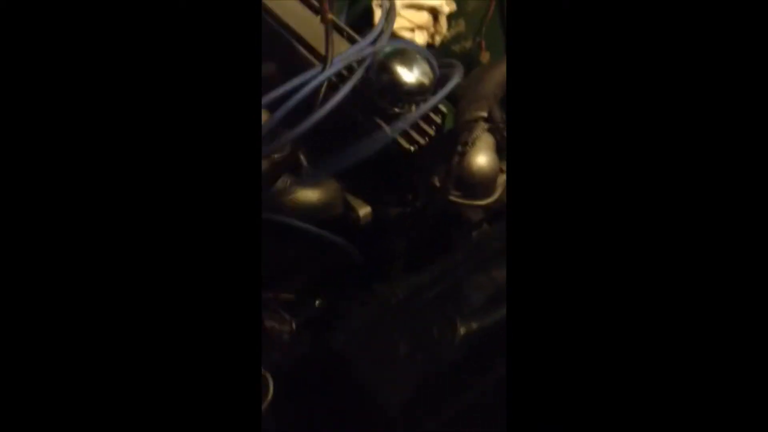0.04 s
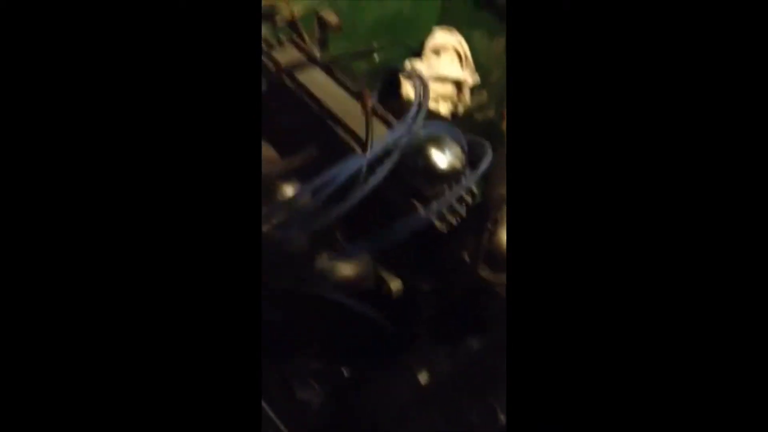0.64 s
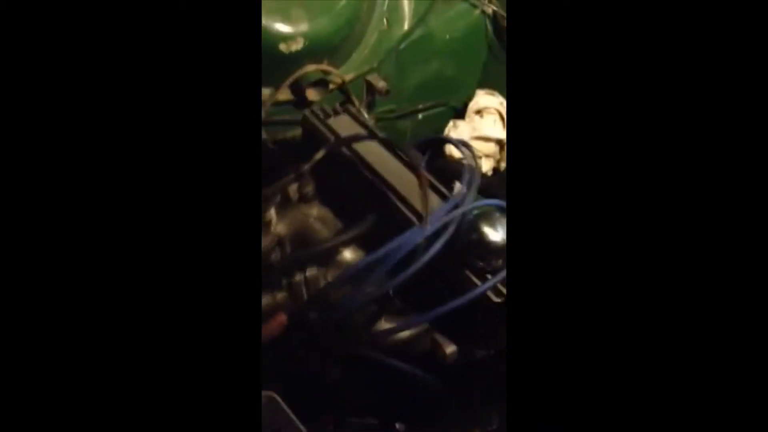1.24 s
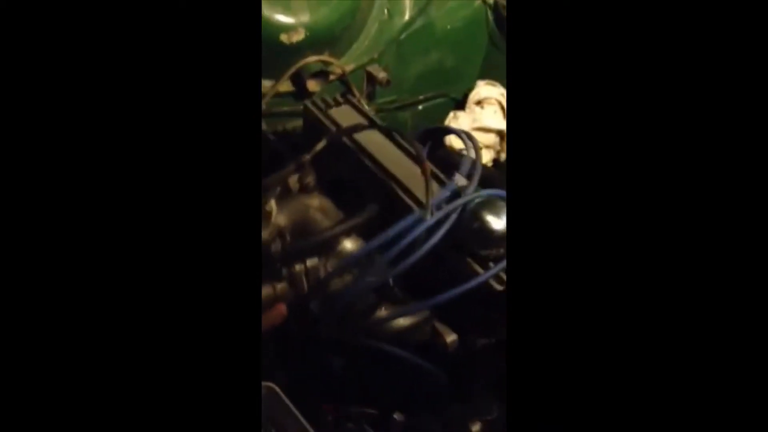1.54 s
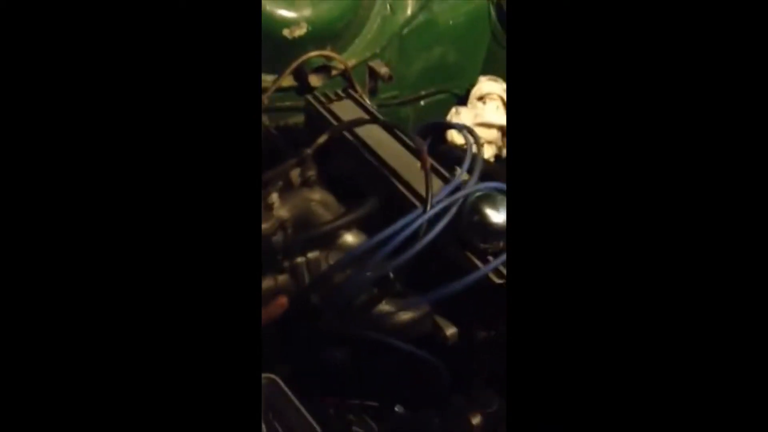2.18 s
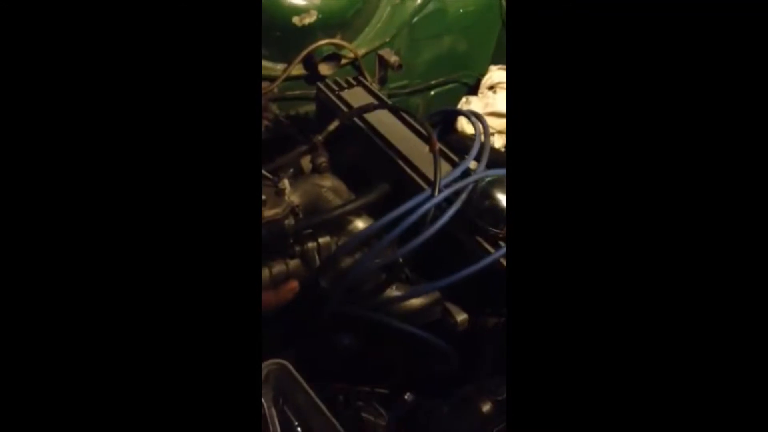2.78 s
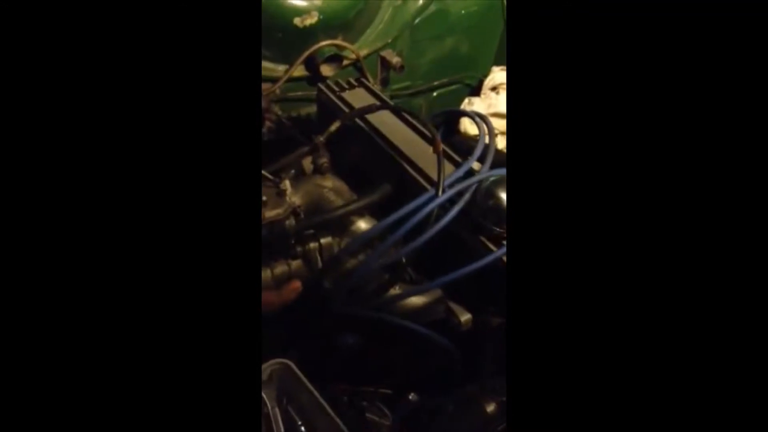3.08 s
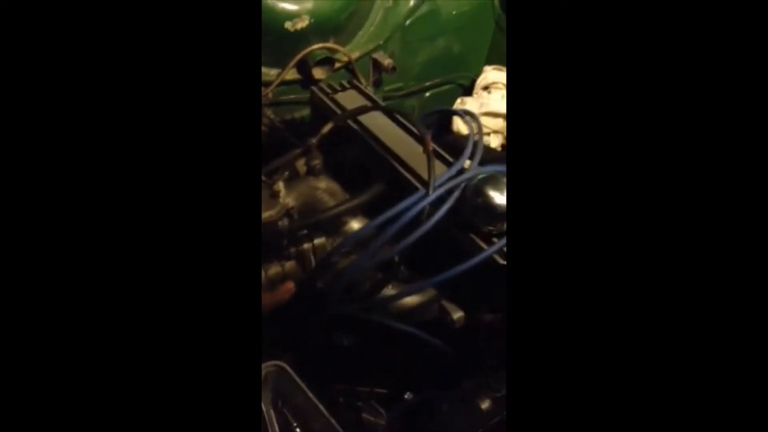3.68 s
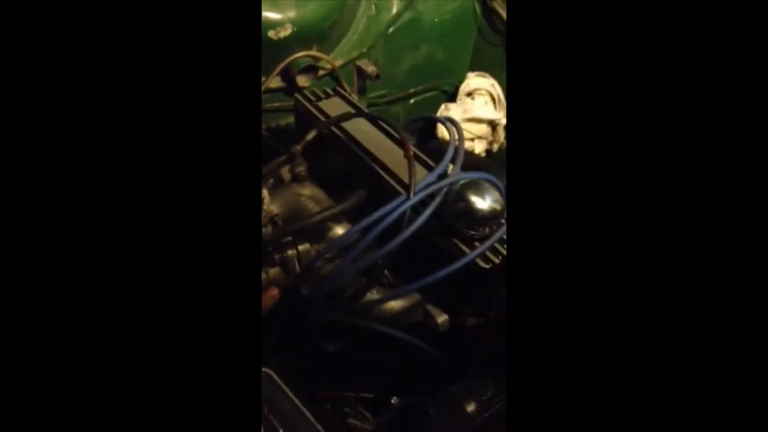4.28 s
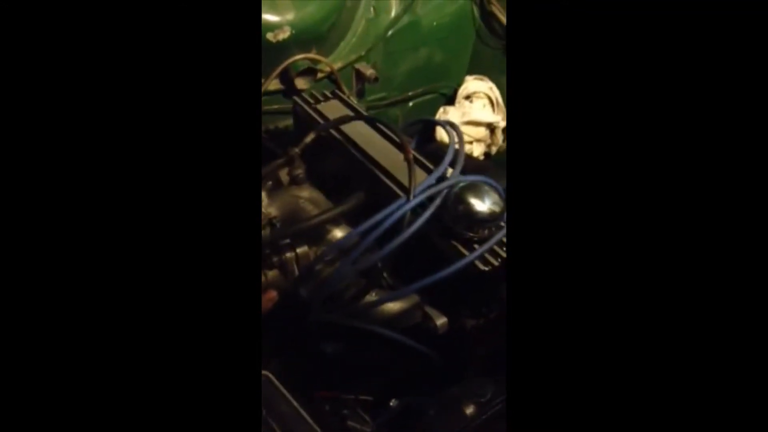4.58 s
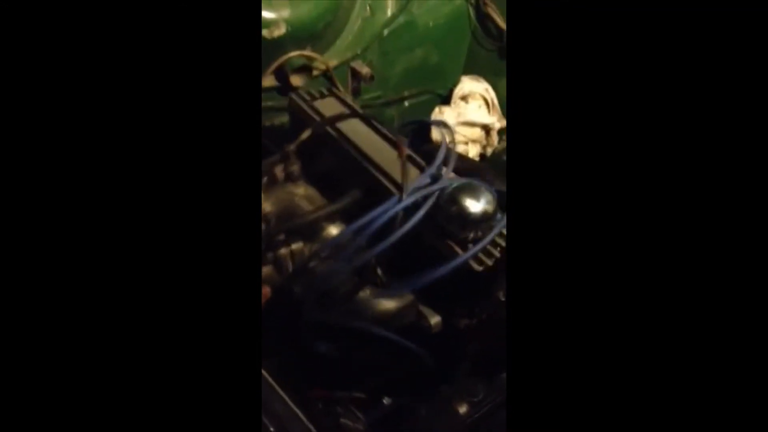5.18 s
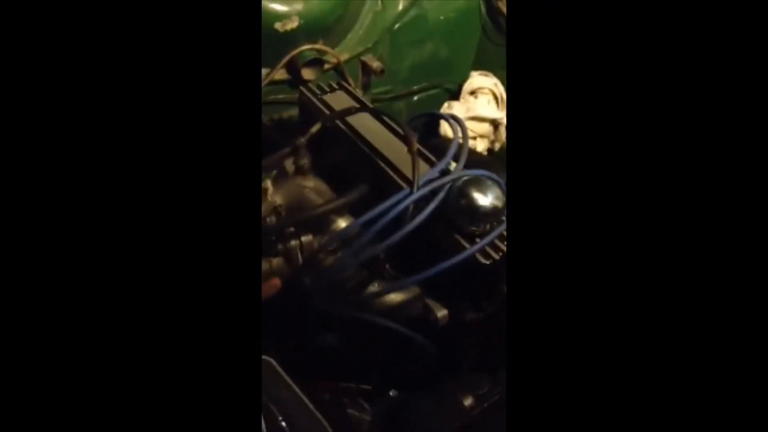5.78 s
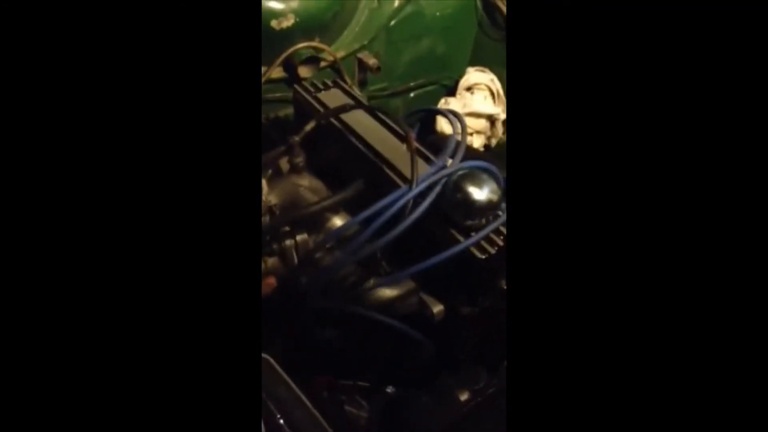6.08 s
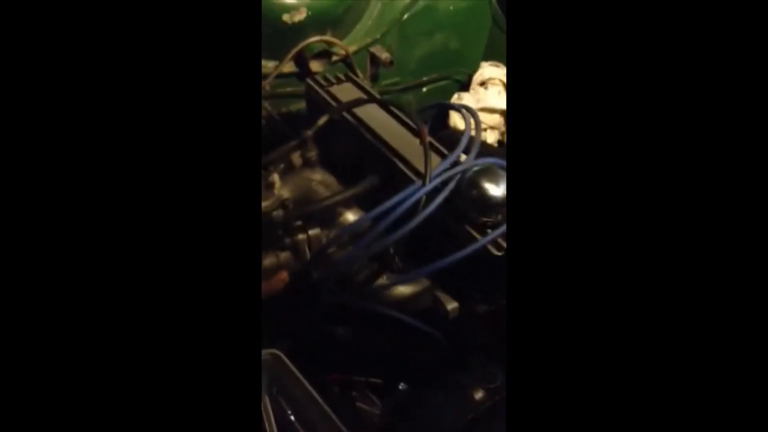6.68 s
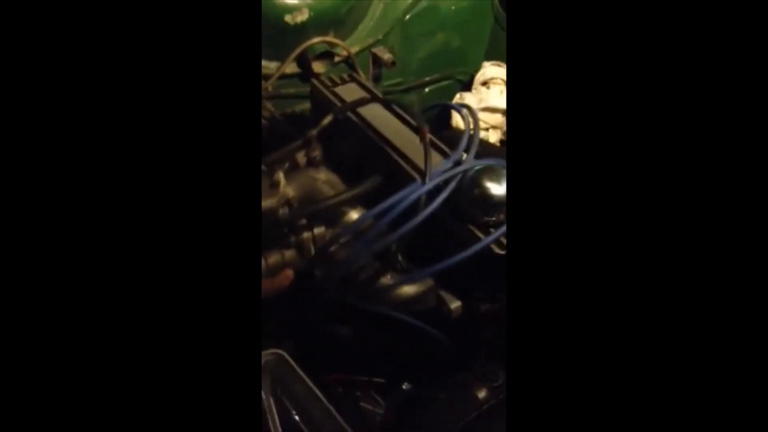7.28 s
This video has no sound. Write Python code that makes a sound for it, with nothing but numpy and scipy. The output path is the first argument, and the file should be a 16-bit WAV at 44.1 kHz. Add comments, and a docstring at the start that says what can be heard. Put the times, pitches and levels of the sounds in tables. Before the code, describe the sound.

An unevenly idling car engine knocks loudly about ten times a second, with bright metallic rattle, ticking and low hum, once nearly stalling.

```python
"""A bad, heavy knock from an unevenly idling four-cylinder car engine, heard just over the open bay.
Once every four-stroke cycle a blow rings the block and shakes loose metal into a bright rattle.
Between the blows the valve gear ticks and whirrs over a low hum and rumble. Crank speed drives them:
faster, the blows land harder and the rattle is shorter and weaker. The engine shudders at the start
and again later, when it misfires and nearly stalls."""
import sys
import numpy as np
from scipy import signal
from scipy.fft import rfft, irfft, next_fast_len
from scipy.io import wavfile
from scipy.ndimage import uniform_filter1d

SR = 44100
rng = np.random.default_rng(int(sys.argv[2]) if len(sys.argv) > 2 else 0)


def persist_wave(psi):
    """Save psi, clipped to +-1, as 16-bit WAV."""
    counts = np.round(np.clip(psi, -1, 1) * 32767).astype(np.int16)
    wavfile.write(sys.argv[1], SR, np.atleast_2d(counts).T)


N = 323694


def undb(db):
    """Decibels to gain."""
    return np.exp(np.asarray(db) * (np.log(10) / 20))


def unit(x):
    """Scale to rms 1."""
    return x / np.sqrt(np.mean(x ** 2))


def noise(points):
    """Noise of rms 1 with a spectrum of (Hz, dB) points."""
    hz, db = np.transpose(points)
    size = next_fast_len(N, real=True)
    bin_hz = np.maximum(np.arange(size // 2 + 1) * SR / size, 1)
    gain = undb(np.interp(np.log(bin_hz), np.log(hz), db))
    return unit(irfft(rfft(rng.standard_normal(size)) * gain, size)[:N])


def flutter(rate_hz):
    """Smooth random wander with a spread near 1."""
    position = np.arange(N) / SR * rate_hz
    return np.interp(position, np.arange(N // 4), rng.standard_normal(N // 4))


def strikes(times_s, sizes):
    """Impulse train."""
    out = np.zeros(N)
    inside = (times_s >= 0) & (times_s < N / SR)
    np.add.at(out, (times_s[inside] * SR).astype(int), sizes[inside])
    return out


def ring(x, response):
    """Convolve with an impulse response."""
    return signal.fftconvolve(x, response)[:N]


def bursts(times_s, sizes, rise_s, hold_s, t60_s):
    """Envelope that rises, holds and decays at each time."""
    t = np.arange(SR // 5) / SR
    shape = (1 - np.exp(-(t / rise_s) ** 2)) * undb(-60 * np.maximum(t - hold_s, 0) / t60_s)
    return ring(strikes(times_s, sizes), shape)


def follow(law_db, rpm, idle_rpm=1200):
    """Level from a law: dB at idle, per octave of speed, per octave/s of pick-up, at full misfire."""
    # Misfire and recovery. Each row: time in seconds, depth from 0 to 1.
    misfire = [(5.345, 0), (5.38, 1), (5.63, .55), (5.72, 0)]
    depth = np.interp(np.arange(N) / SR, *np.transpose(misfire))
    octaves = np.log2(rpm / idle_rpm)
    pick_up = uniform_filter1d(np.gradient(octaves) * SR, size=SR // 4)
    idle_db, speed_db, pick_up_db, misfire_db = law_db
    return idle_db + speed_db * octaves + pick_up_db * pick_up + misfire_db * depth


def rumble(knock_s, blow_db, rpm):
    """Machinery rumble that throbs as each blow jolts the engine."""
    # Rumble spectrum. Each row: frequency in Hz, relative level in dB.
    spectrum = [(25, -54), (50, -45), (75, -30), (110, -28), (145, -6), (220, -2.5), (290, -1), (370, -17),
                (470, -4.5), (700, -3), (1000, -10), (1300, -9.5), (1356, -10.5), (1420, -10.5),
                (2500, -21.5), (3500, -49)]
    # Level law, terms as in follow().
    law_db = (-38.5, -4.5, 1, -4.5)
    jolts = bursts(knock_s, undb(blow_db + 6.5), rise_s=0.00097, hold_s=0.019, t60_s=0.16)
    return noise(spectrum) * undb(follow(law_db, rpm) + 0.93 * flutter(60)) * (1 + jolts)


def hum(cycles, rpm):
    """Engine orders track the crank and swell as they cross the booms of the bay."""
    # Engine orders. Each row: multiple of the cycle rate, relative level in dB.
    orders = [(8, -12), (12, 1.5), (14, -8.5), (15, -6), (16, 1), (18, -5), (19, 2), (20, 1), (22, -6),
              (24, -4.5), (26, -6)]
    # Bay response. Each row: frequency in Hz, gain in dB.
    booms = [(50, -33), (84, -8), (103, -26), (120, -4.5), (140, 6), (160, -9.5), (185, -3.5), (207, 1.5),
             (230, -9.5), (265, -0.5), (310, -2)]
    # Level law, terms as in follow().
    law_db = (-41, 9, 0, -12)
    cycle_hz = np.gradient(cycles) * SR
    out = np.zeros(N)
    for order, db in orders:
        boom_db = np.interp(order * cycle_hz, *np.transpose(booms))
        phase_turns = order * cycles + rng.random() + .015 * flutter(5)
        out += undb(db + boom_db + 1.3 * flutter(5)) * np.sin(2 * np.pi * phase_turns)
    return out * undb(follow(law_db, rpm))


def resonate(x, modes):
    """Thin steel rings; neighbouring modes swing in opposite phase."""
    return sum((-1) ** k * undb(db) * signal.lfilter(*signal.iirpeak(hz, hz / width_hz, SR), x)
               for k, (hz, width_hz, db) in enumerate(modes))


def metal(contacts, cover_db):
    """Rocker cover and small loose fittings, shaken by the same contacts."""
    # Modes of each. Each row: frequency in Hz, width in Hz, gain in dB.
    cover = [(3413, 98, 1), (3692, 54, 3), (4408, 152, 3.5), (4775, 244, 2.5)]
    fittings = [(5840, 78, 0.5), (6492, 400, -10), (7332, 380, 2), (7760, 220, 0.5), (9400, 160, -37),
                (10980, 260, -5.5), (12150, 700, -3), (14500, 1900, -5.5)]
    drive = signal.sosfilt(signal.butter(4, 3000, "high", fs=SR, output="sos"), contacts)
    return undb(cover_db) * resonate(drive, cover) + resonate(drive, fittings)


def valve_gear(knock_s, rpm, cover_db):
    """Four soft ticks a cycle over the whirr of rockers and chain."""
    # Valve ticks. Each row: share of the cycle after the knock, relative level in dB.
    valves = [(.08, -38), (.32, -0.5), (.575, 2), (.82, -1)]
    # Whirr spectrum. Each row: frequency in Hz, relative level in dB.
    whirr = [(900, -11), (2000, 2), (3000, -1), (4600, 0.5), (5600, -0.5), (7500, 0), (9200, -5),
             (12500, -8.5), (15500, -12)]
    # Level law, terms as in follow().
    law_db = (-32.5, -1.5, 0.2, -6)
    # one extra cycle at each end
    cycle_s = np.r_[2 * knock_s[0] - knock_s[1], knock_s, 2 * knock_s[-1] - knock_s[-2]]
    number = np.arange(len(cycle_s))
    share, db = np.transpose(valves)
    tick_s = np.interp((number[:, None] + share).ravel(), number, cycle_s)
    tick_db = np.tile(db, len(number)) + 2.5 * rng.standard_normal(len(tick_s))
    ticks = bursts(tick_s, undb(tick_db), rise_s=0.003, hold_s=0.0018, t60_s=0.064)
    drive = undb(follow(law_db, rpm) + flutter(900)) * (undb(-3.5) + undb(-1) * ticks)
    return drive * noise(whirr) + undb(-7) * metal(drive * noise(whirr), cover_db)


def stumbles():
    """The faltering engine rocks on its mounts with dull thuds and a clatter."""
    # Shudders. Each row: start in seconds, level in dB.
    shudders = [(0.127, -22.5), (5.29, -17.5)]
    # Clatter spectrum. Each row: frequency in Hz, relative level in dB.
    clatter = [(30, -45), (150, -23), (400, -9), (570, -16), (700, 1), (1000, -10), (1650, -3.5),
               (2400, -10.5), (4000, -24)]
    # Thuds. Each row: start in seconds, frequency in Hz, T60 in seconds, level in dB.
    thuds = [(.14, 305, .25, -23), (5.289, 45, .045, -20), (5.3, 565, .2, -20)]
    shudder_s, shudder_db = np.transpose(shudders)
    out = noise(clatter) * bursts(shudder_s, undb(shudder_db), rise_s=0.0007, hold_s=0.013, t60_s=0.19)
    for start_s, hz, t60_s, db in thuds:
        age_s = np.maximum(np.arange(N) / SR - start_s, 0)
        attack = 1 - np.exp(-age_s / .006)
        out += attack * np.sin(2 * np.pi * hz * age_s) * undb(db - 60 * age_s / t60_s)
    return out


def rattle(cycles, rattle_db, cover_db):
    """Loose steel chatters in a dense spray after each blow; a faster crank ends it sooner."""
    # Rattle spectrum. Each row: frequency in Hz, relative level in dB.
    spectrum = [(2200, -49), (3000, -22), (4000, 2.5), (5300, -5), (6000, -2), (8000, 1.5), (10000, -1),
                (15500, -11.5)]
    cap_db = 4  # the steel has limited play
    strength_db = np.minimum(rattle_db, cap_db)[np.maximum(cycles, 0).astype(int)]
    share = cycles % 1

    def swell(rise, hold, t60):
        """Envelope after each knock, timed in shares of the cycle."""
        return (1 - np.exp(-(share / rise) ** 2)) * undb(-60 * np.maximum(share - hold, 0) / t60)

    spray = swell(rise=0.021, hold=0.072, t60=0.4)
    tail = undb(-15.5) * swell(rise=0.14, hold=0.15, t60=3.4)
    contacts = (cycles > 0) * (spray + tail) * undb(strength_db + 2.76 * flutter(1800))
    chatter = undb(-22) * contacts * noise(spectrum)
    chatter += undb(-12) * metal(contacts * rng.standard_normal(N), cover_db)
    # reflections off nearby metal comb the spectrum
    t = np.arange(SR // 50) / SR
    near = rng.standard_normal(len(t)) * undb(-60 * t / .02)
    return .96 * chatter + .33 * ring(chatter, near / np.linalg.norm(near))


def blow(blow_db, clack_db, period_s):
    """One blow and its rebounds ring the block, never twice alike."""
    # Block and sump modes. Each row: frequency in Hz, relative level in dB, T60 in seconds.
    modes = [(219, -28, 0.17), (282.7, -21, 0.028), (496, -25, 0.07), (568.9, -19, 0.1),
             (624.2, -15, 0.077), (653.1, -11, 0.14), (681, -28.5, 0.58), (820.7, -20, 0.12),
             (1104, -21, 0.038), (1287, -33.5, 0.21), (1619, -23.5, 0.045), (1734, -25, 0.042),
             (2027, -17, 0.026), (2350, -20, 0.021)]
    # Rebounds and near reflections. Each row: base delay in seconds, signed gain.
    rebounds = [(0.00271, -0.37), (0.0033, -0.67), (0.00558, 0.034), (0.00804, 0.64), (0.01034, -0.089),
                (0.01272, 0.44), (0.01466, 0.2), (0.01622, 0.26)]
    t = np.arange(SR // 6) / SR
    hz, db, t60_s = np.transpose(modes)[:, :, None]
    main_hz = hz.flat[np.argmax(db)]
    detune, scatter = rng.standard_normal((2, len(modes), 1))
    # a harder contact feeds the high modes
    db = db + np.interp(hz, [800, 1400], [blow_db, clack_db]) + scatter * 0.65 * hz / 1000
    hz = hz * (1 + detune * np.interp(hz, [700, 1700], [.004, .015]))
    block = np.sum(np.cos(2 * np.pi * hz * t) * undb(db - 60 * t / t60_s), axis=0)
    block *= 1 - .5 * np.exp(-t / 0.00092)  # contact force builds
    # a slower crank delays the last rebounds, by whole periods of the main mode
    wait_s = np.round(max(period_s - .086, 0) * .26 * main_hz) / main_hz
    delays_s, gains = np.transpose(rebounds)
    delays_s = delays_s * (1 + .005 * rng.standard_normal(len(rebounds))) + wait_s * (delays_s > .01)
    gains = gains * (1 + .12 * rng.standard_normal(len(rebounds)))
    echoes = sum(gain * np.interp(t - lag_s, t, block, left=0) for lag_s, gain in zip(delays_s, gains))
    # the loose part reseats and damps the ring
    damping_db = np.interp(t - wait_s, [.029, .038, .09], [0, -5, -12])
    return (block + echoes) * undb(damping_db)


def knock(knock_s, blow_db, clack_db):
    """Blows on the block, each with a contact crunch, a later bump and a short wash around the bay."""
    # Crunch and bump spectra. Each row: frequency in Hz, relative level in dB.
    crunch_spectrum = [(100, -44), (500, -15), (900, -4), (1150, -1), (1450, -14.5), (1680, 4),
                       (1900, -3.5), (2100, -0.5), (2400, -8), (2900, -34)]
    bump_spectrum = [(60, -50), (380, -8), (500, 0), (620, 8), (730, -2), (950, -12), (1700, -27),
                     (3000, -46)]
    periods_s = np.gradient(knock_s)
    block = np.zeros(N + SR)
    for k, start in enumerate((knock_s * SR).astype(int)):
        hit = blow(blow_db[k], clack_db[k], periods_s[k])
        block[start:start + len(hit)] += hit
    # contact time dulls the blow; the block radiates little bass
    block = signal.sosfilt(signal.butter(6, 2350, fs=SR, output="sos"), block[:N])
    block = signal.sosfilt(signal.butter(2, 135, "high", fs=SR, output="sos"), block)
    crunch = noise(crunch_spectrum)
    crunch *= bursts(knock_s, undb(clack_db), rise_s=0.00037, hold_s=0.012, t60_s=0.019)
    # one crank turn later the unloaded part shifts again
    bumps = noise(bump_spectrum)
    bumps *= bursts(knock_s + 0.502 * periods_s, undb(blow_db), rise_s=0.0018, hold_s=0.0076, t60_s=0.046)
    direct = undb(-0.94) * block + undb(-21.5) * crunch + undb(-28.5) * bumps
    t = np.arange(SR // 4) / SR
    walls = rng.standard_normal(len(t)) * undb(-60 * t / 0.33) * (t > .008)
    return direct + undb(-16.5) * ring(direct, walls / np.linalg.norm(walls))


def knock_schedule(cycles, rpm):
    """One knock a cycle, alternately harder and softer: times, then blow, clack and rattle levels."""
    # Level laws, terms as in follow().
    blow_law = (1.14, 5, 1.03, -6.5)
    clack_law = (-0.7, 7.5, .5, -9)
    rattle_law = (1.42, -3.5, 0.4, -11)
    # Alternating offset and random spread, each for blow, clack, rattle.
    alternate_db = (0.1, 0.57, 0.34)
    scatter_db = (.7, 1.6, 1)
    t = np.arange(N) / SR
    number = np.arange(int(cycles[-1]) + 1)
    knock_s = np.interp(number, cycles, t)
    uneven_db = np.outer((-1) ** number, alternate_db)
    uneven_db += rng.standard_normal((len(number), len(scatter_db))) * scatter_db
    levels_db = [np.interp(knock_s, t, follow(law, rpm)) for law in (blow_law, clack_law, rattle_law)]
    return knock_s, *(levels_db + uneven_db.T)


def scene():
    """Crank speed paces the engine and steers its levels; the stumbles come at set times."""
    # Crank speed. Each row: time in seconds, speed in rpm.
    speed = [(0.155, 690.6), (0.446, 1035.1), (0.924, 1052.0), (1.766, 1169.0), (2.027, 1324.8),
             (2.402, 1412.6), (3.037, 1427.7), (3.346, 1286.3), (3.58, 1280.8), (4.135, 1431.1),
             (4.801, 1185.3), (5.27, 1154.2), (5.305, 1244.9), (5.742, 901.6), (6.11, 1308.4),
             (6.57, 1253.1), (6.878, 1283.3), (7.155, 1111.0)]
    # Ring reaching the moving phone. Each row: time in seconds, block gain in dB, cover gain in dB.
    exposure = [(0, -5, -3.5), (.5, 3, -2.5), (1.3, -0.9, 0.5), (2.8, 1.5, 1), (5, 0.5, 3),
                (5.802, -0.8, 1), (6.4, 0, 2.5), (7.34, -2, 4.5)]
    t = np.arange(N) / SR
    rpm = np.interp(t, *np.transpose(speed))
    exposure_s, *gains_db = np.transpose(exposure)
    block_db, cover_db = (np.interp(t, exposure_s, db) for db in gains_db)
    first_knock_s = .1252
    cycles = np.cumsum(rpm / 60 / 2) / SR  # two crank turns a cycle
    cycles -= np.interp(first_knock_s, t, cycles)
    knock_s, blow_db, clack_db, rattle_db = knock_schedule(cycles, rpm)
    blow_db = blow_db + np.interp(knock_s, t, block_db)
    mix = rumble(knock_s, blow_db, rpm) + knock(knock_s, blow_db, clack_db)
    mix += rattle(cycles, rattle_db, cover_db) + valve_gear(knock_s, rpm, cover_db)
    return (mix + hum(cycles, rpm) + stumbles())[None]


def record(dry):
    """The phone rounds the loudest peaks and cuts the top."""
    ceiling, top_hz = 0.76, 15300
    rounded = ceiling * np.tanh(dry / ceiling)
    return signal.sosfilt(signal.ellip(8, .2, 70, top_hz, fs=SR, output="sos"), rounded)


dry = scene()
out = record(dry)
persist_wave(out)
```